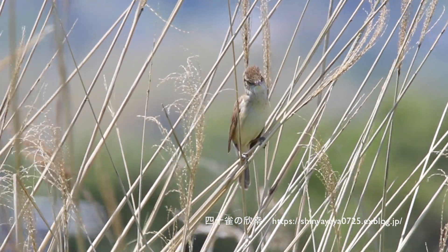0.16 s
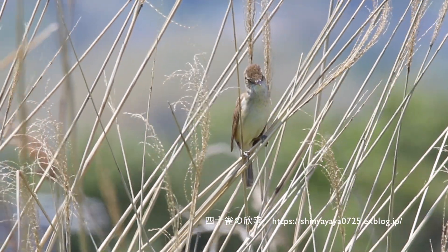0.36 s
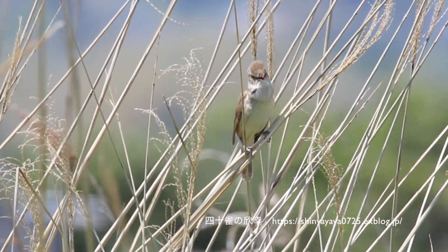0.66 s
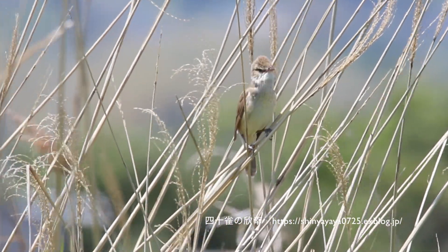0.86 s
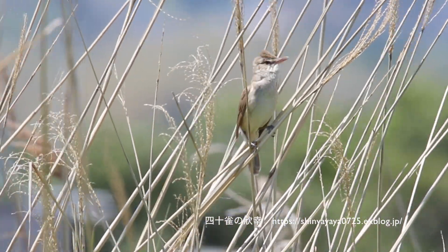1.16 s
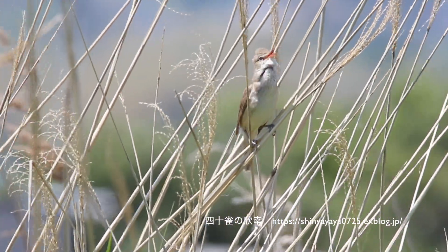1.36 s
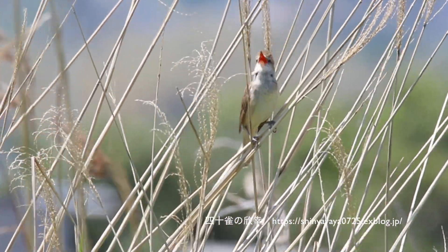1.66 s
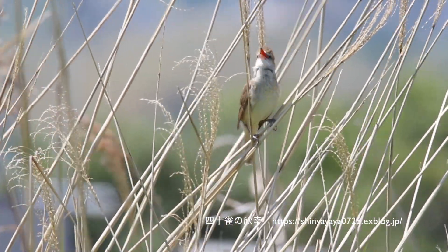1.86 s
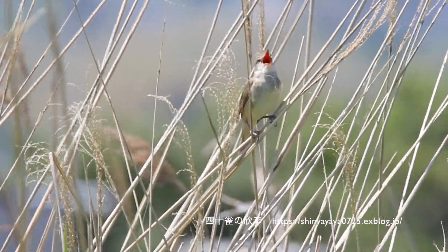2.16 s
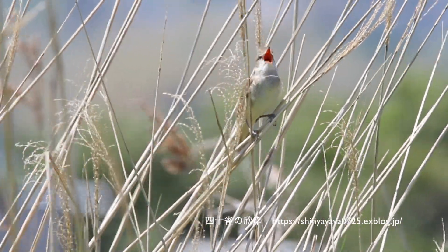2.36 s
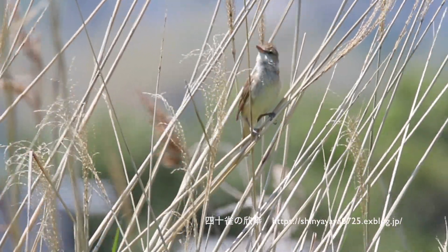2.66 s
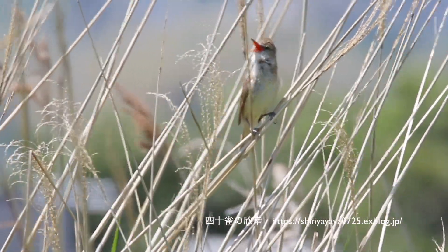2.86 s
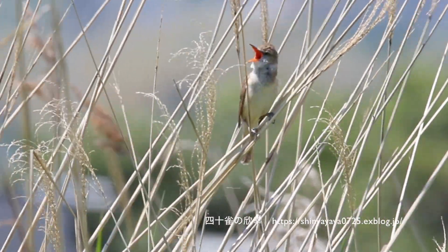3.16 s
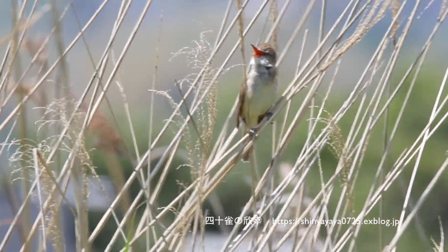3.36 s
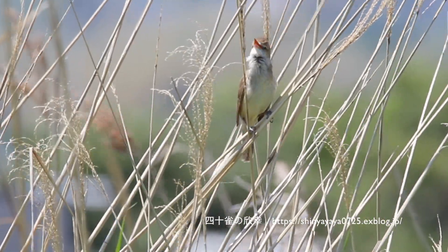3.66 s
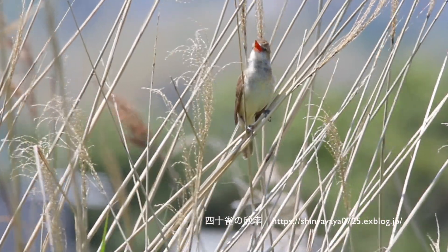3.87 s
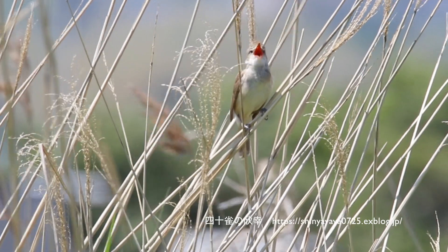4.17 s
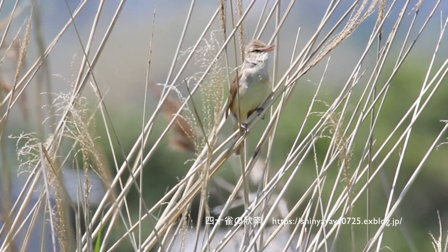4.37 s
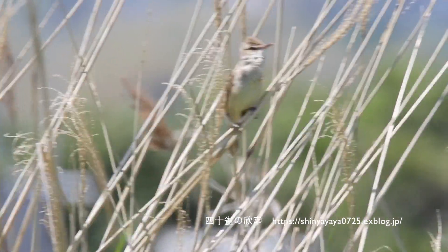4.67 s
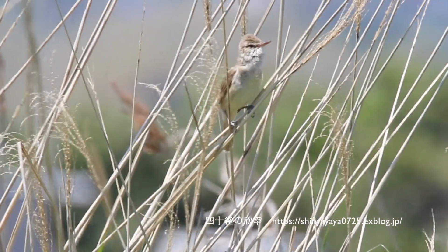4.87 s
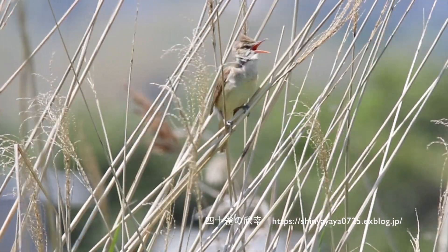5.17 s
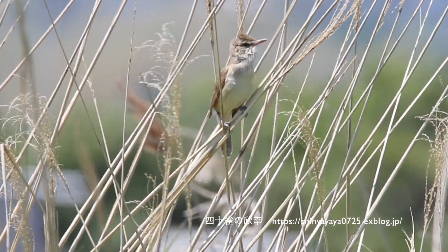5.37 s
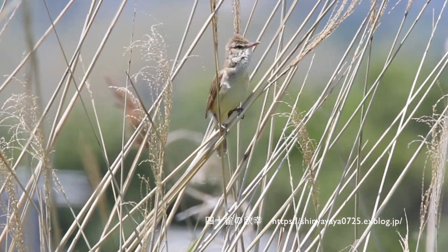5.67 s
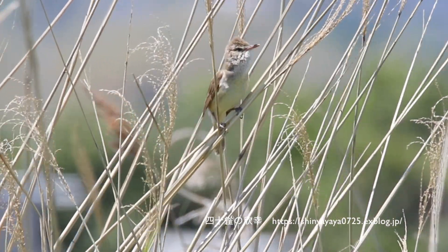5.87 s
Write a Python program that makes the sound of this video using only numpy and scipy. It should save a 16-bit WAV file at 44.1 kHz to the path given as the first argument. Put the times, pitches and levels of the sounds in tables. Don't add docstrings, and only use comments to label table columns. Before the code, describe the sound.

A reed warbler close by sings harsh grating churrs, thin trills and rattles ending in barks, over far traffic, engine drone and soft wind rumble.

```python
import sys
import numpy as np
from scipy import signal
from scipy.fft import rfft, irfft
from scipy.io import wavfile
from scipy.ndimage import uniform_filter1d

SR = 44100
rng = np.random.default_rng(int(sys.argv[2]) if len(sys.argv) > 2 else 0)


def boost(x):
    u = np.asarray(x, float) / 20
    return 10 ** u


def wav_record(signal):
    frames = np.transpose(np.atleast_2d(signal))
    bounded = np.clip(frames, -1, 1)
    quanta = np.round(bounded * 32767).astype(np.int16)
    wavfile.write(sys.argv[1], SR, quanta)


N = 265526

# start in seconds, length in ms, level in dB, throat resonance in Hz, time to peak in ms.
BARKS = [
    (1.7773, 15, -17, 3810, 2.2),
    (2.398, 18.6, -15, 4160, 4.8),
    (2.5375, 22.6, -17, 4080, 7),
    (3.2977, 18.2, -14, 3923, 4.2),
    (3.465, 15.7, -13, 4297, 12.6),
    (4.1929, 16.5, -14, 3965, 3.4),
    (4.3488, 24.3, -14, 4190, 3.7),
    (5.323, 15.6, -17.5, 3024, 3.9),
]


def rms_one(x):
    return x / np.sqrt(np.mean(np.abs(x) ** 2) + 1e-20)


def at_hz(points, hz):
    point_hz, point_db = np.transpose(points)
    return np.interp(np.log(hz + 1), np.log(point_hz + 1), point_db)


def shaped(gain):
    white = rng.standard_normal(2 * len(gain) - 2)
    return rms_one(irfft(rfft(white) * gain)[:N])


def drift(rate_hz):
    hz = np.fft.rfftfreq(2 ** 19, 1 / SR)
    return shaped(1 / (1 + (hz / rate_hz) ** 2))


def ring_down(pulses, width_hz):
    r = np.exp(-np.pi * width_hz / SR)
    return rms_one(signal.lfilter([1], [1, -2 * r, r * r], pulses))


def swell(size, rise_ms, fall_ms, power=0.67):
    ms = (np.arange(size) + 0.5) * 1000 / SR
    shape = np.clip(ms / rise_ms, 0, 1) * np.clip(ms[::-1] / fall_ms, 0, 1)
    return rms_one(np.sin(np.pi / 2 * shape) ** power)


def distance():
    # frequency in Hz, density in dB per Hz.
    far_mid = [(15, -43), (25, -7.5), (76, -8.5), (108, -4.5), (177, -8), (208, -3), (273, -4), (304, -0.5),
               (368, -8), (809, -6), (927, -9.5), (1880, -9.5), (2600, -14.5), (14800, -38), (16500, -18.5)]
    far_side = [(15, -40), (25, -16), (74, -28), (92, 0.5), (114, 2), (154, -6), (172, -31), (202, -8.5),
                (266, -21), (304, -8.5), (510, -27.5), (687, -18.5), (2330, -24.5), (15200, -47),
                (16500, -58)]
    # frequency in Hz, left minus right in dB.
    far_pan = [(60, 5.5), (110, 1), (200, -7.5), (380, 9), (700, 1.5), (1290, 4.5), (2380, 0.5), (4400, 10),
               (8120, 2), (15000, 3)]
    # frequency in Hz, width in Hz, centre level in dB, side level in dB.
    drone = [(109.3, 3.1, -59.5, -53.5), (216.3, 18, -55.5, -51.5), (306.3, 51, -52.5, -66),
             (487, 7.6, -72, -57)]
    hz = np.fft.rfftfreq(2 ** 19, 1 / SR)
    mid = boost(-40 + 0.5 * drift(22.0)) * shaped(boost(at_hz(far_mid, hz)))
    side = boost(-41) * shaped(boost(at_hz(far_side, hz)))
    for line_hz, width_hz, mid_db, side_db in drone:
        line = 1 / (1 + (2 * (hz - line_hz) / width_hz) ** 2)
        mid = mid + boost(mid_db) * shaped(line)
        side = side + boost(side_db) * shaped(line)
    pan = boost(at_hz(far_pan, np.fft.rfftfreq(N, 1 / SR)) / 2)
    return irfft(rfft([mid + side, mid - side]) * [pan, 1 / pan], N)


def wind():
    # time of gust in seconds, peak in dB.
    gusts = [(.03, -55), (.75, -51), (1.12, -46), (1.81, -38.5), (1.97, -38.5), (2.51, -38), (3.74, -46),
             (3.88, -37.5), (3.98, -42), (4.58, -44), (4.98, -49)]
    calm_db, rise_db_per_s, fall_db_per_s = -57, 150, 120
    after_db, after_fall_db_per_s = -8.5, 12
    hz = np.fft.rfftfreq(2 ** 19, 1 / SR)
    gain = (hz / 22) ** 2 / (1 + (hz / 22) ** 2) / (1 + (hz / 50) ** 3)
    level_db = np.full(N, float(calm_db))
    for s, db in gusts:
        t = np.arange(N) / SR - s
        after = np.maximum(-fall_db_per_s * t, after_db - after_fall_db_per_s * t)
        level_db = np.maximum(level_db, db + np.where(t < 0, rise_db_per_s * t, after))
    return boost(level_db + 2.5) * np.array([shaped(gain), shaped(gain)])


def rasp(bursts, chest_db, snaps_per_s=520, jitter=0.35, breathy=0.15, spread_db=5.5, even=0.92, onset=0.37,
         side_db=-2.0, chest_width_hz=500):
    # multiple of throat frequency, width as a share of it, level in dB.
    windpipe = [(.96, 0.17, 1), (1.2, 0.24, -6.5), (.8, 0.14, -14), (1.05, 0.47, -12.5)]
    # frequency in Hz, width in Hz, level in dB.
    beak = [(4334, 1130, -9.5), (7810, 1900, -21.5), (10250, 3200, -17), (13500, 2200, -35)]
    chest_hz = 1345
    out = np.zeros(N)
    count = len(bursts)
    gaps = SR / snaps_per_s * np.exp(jitter * rng.standard_normal((count, 40)))
    sizes = boost(spread_db * rng.standard_normal((count, 40)))
    chance = rng.random((count, 9, 40))
    air = rng.standard_normal((count, 2, 3000))
    for k, (start, ms, level_db, from_hz, to_hz, peak_ms) in enumerate(bursts):
        size = int(ms * 1.11 * SR / 1000)
        at = (np.cumsum(gaps[k]) - gaps[k, 0] + 0.0006 * SR).astype(int)
        keep = at < size
        throat = np.linspace(1.5 * from_hz - 0.5 * to_hz, 1.5 * to_hz - 0.5 * from_hz, size)
        gape_db = 22.6 * np.log2(from_hz / 4000)
        modes = [(m * throat, w * from_hz, db + side_db * (db < 0)) for m, w, db in windpipe]
        modes += [(np.full(size, hz), width_hz, db + gape_db) for hz, width_hz, db in beak]
        modes += [(np.full(size, chest_hz), chest_width_hz, chest_db - 0.56 * gape_db)]
        note = 0
        for j, (hz, width_hz, mode_db) in enumerate(modes):
            drive = breathy * np.roll(air[k, 0] + 1j * air[k, 1], 97 * j)[:size]
            drive[at[keep]] += (sizes[k] * np.exp(2j * np.pi * chance[k, j]))[keep]
            carrier = np.exp(2j * np.pi * np.cumsum(hz) / SR)
            note = note + boost(mode_db) * ring_down(drive, width_hz) * carrier
        held = uniform_filter1d(np.abs(note) ** 2, size=130) + 0.05
        note = note.real / held ** (even / 2)
        note *= swell(size, 1.33, 1.9 + 1.1 * max(ms - peak_ms, 0))
        note *= onset + (1 - onset) * np.clip(np.arange(size) * 1000 / SR / peak_ms, 0, 1)
        first = round(start * SR)
        out[first:first + size] += boost(level_db - 0.65) * rms_one(note)
    return out


def burst_groups(notes, pattern):
    last_gap_ms = 19.9
    bursts = []
    for start, level_db, lift, *gaps in notes:
        for gap, (fill, db, from_hz, to_hz, peak) in zip(gaps + [last_gap_ms], pattern):
            ms = fill * gap
            if start > -0.005:
                bursts.append((max(start, 0), ms, level_db + db, lift * from_hz, lift * to_hz, peak * ms))
            start, lift = start + gap / 1000, 1
    return bursts


def churrs():
    # share of the gap filled, level in dB, throat resonance at start in Hz,
    # the same at end in Hz, time to peak as a share of the length.
    rising_churr = [
        (0.92, -1.5, 2300, 2330, .25),
        (0.834, 0.072, 2620, 2950, 0.37),
        (1.11, 0.43, 2950, 2480, .1),
    ]
    soft_churr = [
        (.83, 0, 2592, 2330, 0.73),
        (.96, -2.5, 2223, 2160, 0.33),
        (1.01, 0.5, 2270, 2350, .36),
    ]
    sharp_churr = [
        (0.82, 3.5, 3040, 3200, 0.23),
        (1.28, 0, 2430, 2350, 0.17),
        (1.25, 0.6, 2320, 2370, 0.61),
    ]
    chuck = [
        (0.73, -4, 2380, 2850, .26),
        (1.3, -1.5, 2620, 2550, 0.34),
        (0.97, -3.5, 2490, 2300, 0.1),
    ]
    # start in seconds, level in dB, pitch factor of the first burst,
    # first gap in ms, second gap in ms.
    rising = [
        (-.014, -26.5, 1.01, 12, 18.6),
        (.785, -23, 1.04, 14, 29.7),
    ]
    soft = [
        (1.3771, -22.5, 0.98, 24.7, 13),
        (2.0075, -21, 0.99, 25.2, 12.7),
        (2.8994, -22.5, 0.97, 20.1, 18.3),
        (3.774, -20, 1.015, 17, 18),
    ]
    sharp = [
        (1.4719, -24, 0.97, 18.8, 18.5),
        (2.1002, -23, 1.09, 20, 17.3),
        (2.9914, -22, 0.95, 19.8, 15),
        (3.8644, -22, 0.94, 20.8, 16),
    ]
    chucks = [
        (4.8711, -17, 1.02, 8.6, 8.4),
        (5.6286, -20, .98, 13, 9.6),
    ]
    return (burst_groups(soft, soft_churr) + burst_groups(sharp, sharp_churr)
            + burst_groups(rising, rising_churr) + burst_groups(chucks, chuck))


def ports(x):
    bird_pan_db, right_lag_s = -4, 4.2e-5
    hz = np.fft.rfftfreq(N, 1 / SR)
    right = irfft(rfft(x) * np.exp(-2j * np.pi * hz * right_lag_s), N)
    return np.array([x * boost(bird_pan_db / 2), right * boost(-bird_pan_db / 2)])


def reeds(x):
    early_db, early_t60_s, late_db, late_t60_s = -9.5, 0.019, -14, 0.54
    t = np.arange(int(0.45 * SR)) / SR
    early = boost(early_db) * rms_one(boost(-60 * t / early_t60_s) * rng.standard_normal((2, len(t))))
    build_up = 1 - np.exp(-t / 0.0014)
    late = rms_one(boost(-60 * t / late_t60_s) * build_up * rng.standard_normal((2, len(t))))
    dull = signal.butter(2, 6000, fs=SR, output="sos")
    late = signal.sosfilt(dull, boost(late_db) * late)
    return signal.fftconvolve(x[None], (early + late) / np.sqrt(len(t)), axes=1)[:, :N]


def ticks():
    # start in seconds, length in ms, level in dB, throat resonance in Hz.
    small = [(.042, 8, -38, 2480), (.762, 2.8, -34, 3600), (0.7682, 11, -34, 3850), (0.847, 11, -35, 2500),
             (1.107, 7.5, -37, 3370), (1.114, 19, -35.5, 3800), (1.36, 11, -43, 2780),
             (1.3716, 3.6, -33, 2550), (1.9946, 9.3, -42, 2690), (2.067, 8, -27, 2390),
             (2.4749, 15, -40, 3800), (2.8911, 6.1, -36, 2560), (3.7668, 4.2, -31, 2570),
             (4.8612, 5.2, -36, 2420)]
    peak = 0.23
    return [(s, ms, db, hz, hz, peak * ms) for s, ms, db, hz in small]


def whistle():
    # time in seconds, pitch in Hz, level in dB.
    glide = [
        (1.127, 2600, -46),
        (1.1295, 2920, -37),
        (1.132, 5530, -35),
        (1.14, 5540, -38),
        (1.15, 5120, -38),
        (1.16, 4580, -40),
        (1.166, 4430, -41),
        (1.169, 4300, -60),
    ]
    s, hz, level_db = np.transpose(glide)
    t = np.arange(N) / SR
    phase = 2 * np.pi * np.cumsum(np.interp(t, s, hz) + 90 * drift(680)) / SR
    throb_db = 2.1 * np.cos(2 * np.pi * 105 * (t - 1.139))
    tone = np.sin(phase) + 0.06 * np.sin(2 * phase)
    return boost(np.interp(t, s, level_db, -120, -120) + 6 + throb_db) * tone


def trills():
    # start in seconds, level in dB, top pitch in Hz, widest drop in Hz, sweeps per second.
    sweeps = [
        (1.608, -31.5, 6530, 2680, 123),
        (2.228, -36.5, 6460, 2600, 103),
        (3.124, -34.5, 6390, 2850, 125),
        (4.011, -31.5, 6200, 2620, 112),
    ]
    trill_ms = 71
    out = np.zeros(N)
    tempo, depth, flutter, grit = drift(40), drift(40), drift(160), drift(540)
    for start, level_db, top_hz, drop_hz, per_s in sweeps:
        first, size = round(start * SR), int(trill_ms * SR / 1000)
        span = slice(first, first + size)
        cycle = np.cumsum(per_s * (1 + 0.1 * tempo[span]) / SR) % 1
        fall = 0.5 - 0.5 * np.cos(np.pi * np.where(cycle < 0.65, cycle / 0.73, (1 - cycle) / 0.63))
        arch = 1 - 0.16 * np.abs(np.linspace(-1, 0.8, size)) ** 1.5
        reach = np.clip(0.7 + 0.25 * depth[span], 0.2, 1.1)
        hz = top_hz * arch - drop_hz * fall ** 2 * reach + 240 * grit[span]
        loud = boost(level_db - 9.9 * (cycle > 0.7) - 2.1 * fall + 2.0 * flutter[span])
        phase = 2 * np.pi * np.cumsum(hz) / SR
        out[span] += loud * swell(size, 8.5, 2.7) * (np.sin(phase) + boost(-11) * np.sin(2 * phase))
    return out


def undertones():
    # start in seconds, length in ms, level in dB, throat resonance at start in Hz, at end in Hz.
    hoarse = [
        (1.645, 30, -39, 4200, 3960),
        (2.262, 40, -37, 3980, 4370),
        (3.15, 45, -41, 3840, 3970),
        (4.016, 20.5, -44, 3150, 3300),
        (4.041, 42, -41, 3830, 3970),
    ]
    peak = 0.48
    return [(s, ms, db, from_hz, to_hz, peak * ms) for s, ms, db, from_hz, to_hz in hoarse]


def rattles():
    # first snap in seconds, gap in ms, level in dB, throat resonance in Hz.
    snaps = [
        (1.708, 3.9, -37.5, 3900),
        (2.3334, 4.4, -34, 3900),
        (2.488, 6.4, -34.5, 4130),
        (3.2287, 4.4, -36, 3950),
        (3.4136, 5, -31, 3900),
        (4.1237, 3.7, -31.5, 3830),
        (4.2976, 5.4, -26, 3770),
        (5.2686, 5.3, -33.5, 3360),
    ]
    snap_counts = [6, 3, 4, 4, 1, 4, 2, 4]
    # last pulse in seconds, its level in dB, level the run climbs to in dB, gap in ms,
    # throat resonance in Hz.
    runs = [
        (1.77, -15, -22, 8, 3890),
        (2.3909, -20, -22.5, 8, 4150),
        (2.529, -18, -25, 6.6, 4174),
        (3.29, -22, -20, 7.7, 4250),
        (3.4592, -13.5, -20, 8.6, 4260),
        (4.185, -15.5, -21, 8.4, 4046),
        (4.3404, -19, -24, 6.7, 4220),
        (5.315, -20.5, -26, 8.9, 3600),
    ]
    run_pulses = [5, 6, 2, 6, 4, 5, 4, 3]
    pause_ms, crescendo_db_per_pulse, pulse_fill, pulse_peak_ms, last_pulse_ms = 8.8, 1.54, 0.65, 2.6, 6.5
    uneven_gap, uneven_db, uneven_pitch = 0.085, 0.9, 0.026
    snap_ms, snap_gain_db = 1.87, 2.3
    bursts = []
    chance = np.clip(rng.standard_normal((len(runs), 2, 10, 4)), -2, 2)
    for (last, last_db, run_db, gap, hz), bark, count, luck in zip(runs, BARKS, run_pulses, chance[:, 0]):
        for k in range(count):
            start = last - (pause_ms + gap * (k + uneven_gap * luck[k, 0] * (k > 0))) / 1000
            from_hz, to_hz = hz * (1 + uneven_pitch * luck[k, 2:])
            db = run_db - crescendo_db_per_pulse * k + uneven_db * luck[k, 1]
            bursts.append((start, pulse_fill * gap, db, from_hz, to_hz, pulse_peak_ms))
        bark_hz = bark[3]
        bursts.append((last, last_pulse_ms, last_db, 1.03 * bark_hz, bark_hz, pulse_peak_ms))
    for (first, gap, db, hz), count, luck in zip(snaps, snap_counts, chance[:, 1]):
        for k in range(count):
            start = first + gap * (k + uneven_gap * luck[k, 0] * (k > 0)) / 1000
            bursts.append((start, snap_ms, db + snap_gain_db * k, hz, hz, snap_ms / 3))
    return bursts


def barks():
    sag, shudder_db, shudder_ms, wait_ms = 0.92, -21, 10, 3.3
    bursts = []
    for s, ms, db, hz, peak_ms in BARKS:
        bursts.append((s, ms, db, hz, sag * hz, peak_ms))
        shudder_s = s + (ms + wait_ms) / 1000
        bursts.append((shudder_s, shudder_ms, db + shudder_db, 0.83 * hz, 0.8 * hz, 1.5))
    return bursts


def grunts():
    # start in seconds, level in dB.
    lead_ins = [
        (4.834, -34.5),
        (5.598, -35.5),
    ]
    ms, from_hz, to_hz, peak_ms = 17, 2330, 2500, 4.1
    return [(s, ms, db, from_hz, to_hz, peak_ms) for s, db in lead_ins]


def scene():
    low = rasp(churrs() + ticks(), -25)
    high = rasp(rattles() + barks() + undertones(), -26.0, snaps_per_s=610, breathy=0.089, spread_db=0.0,
                even=0.69, onset=0.61, side_db=-0.5)
    chesty = boost(5.0) * rasp(grunts(), -2.3, even=1.0, chest_width_hz=144)
    song = low + chesty + high + trills() + whistle()
    return ports(song) + reeds(song) + distance() + wind()


def band_limit(x):
    return signal.sosfilt(signal.butter(12, 16810, fs=SR, output="sos"), x)


def record(dry):
    hiss_db, cutoff_hz = -53, 15950
    hiss = boost(hiss_db) * rng.standard_normal(dry.shape)
    tallness = np.tanh((dry / 0.85) ** 3) ** 2
    rounded = tallness * (0.7 * np.tanh(dry / 0.7) - dry) + dry
    top_cut = signal.cheby2(16, 60, cutoff_hz + 250, fs=SR, output="sos")
    mix = signal.sosfilt(top_cut, rounded + hiss)
    return band_limit(mix)


dry = scene()
out = record(dry)
wav_record(out)
```